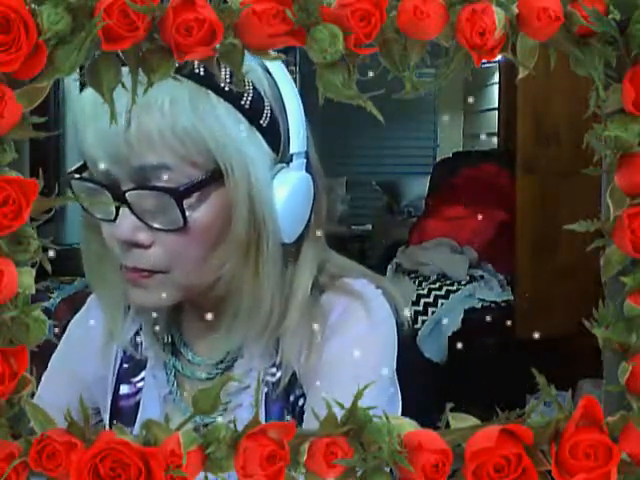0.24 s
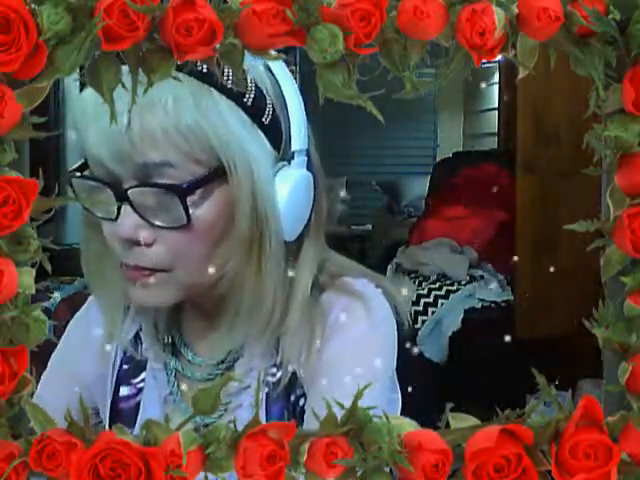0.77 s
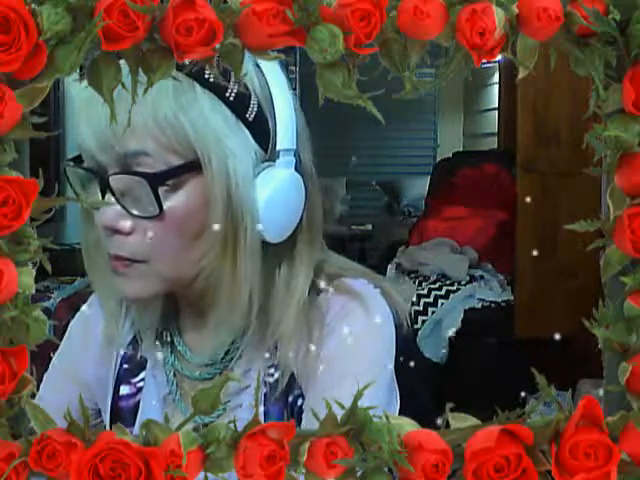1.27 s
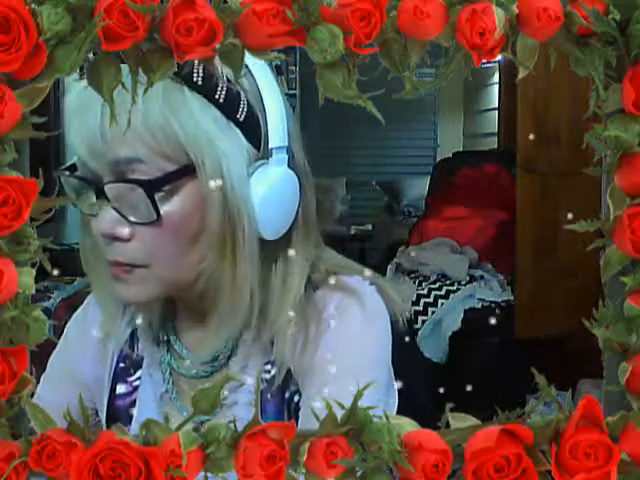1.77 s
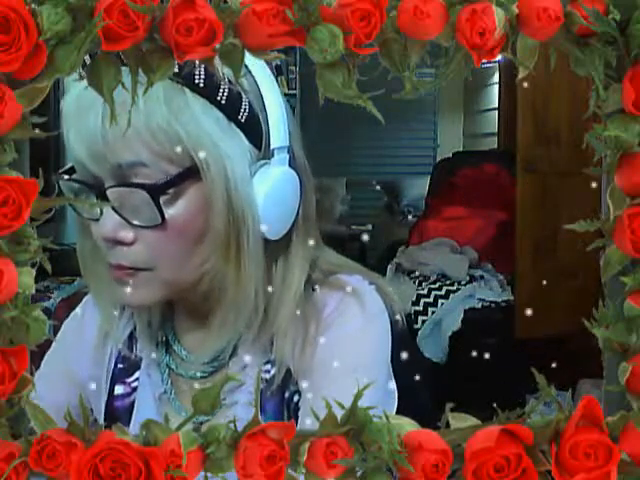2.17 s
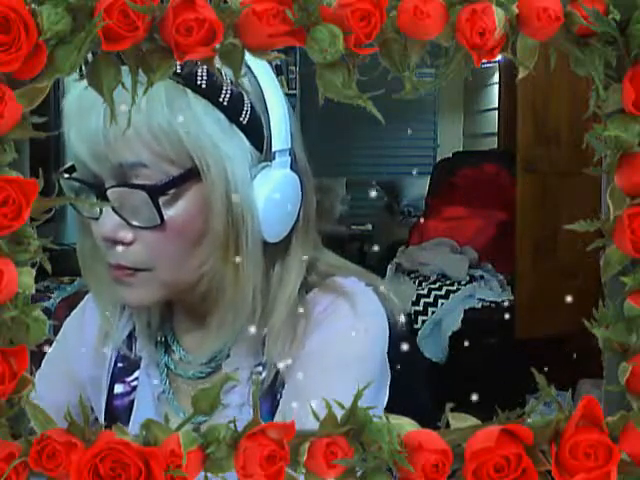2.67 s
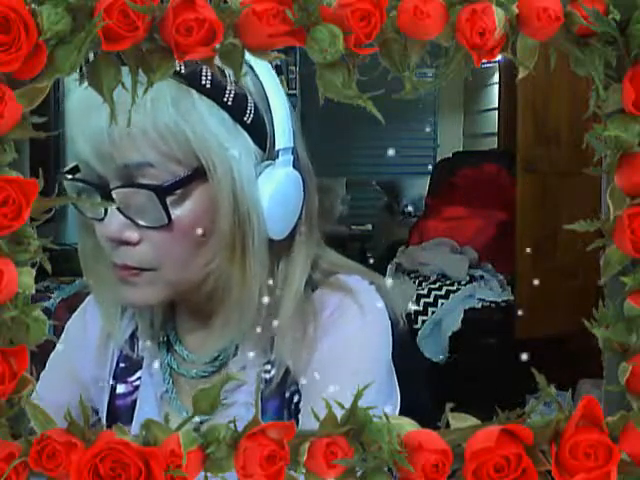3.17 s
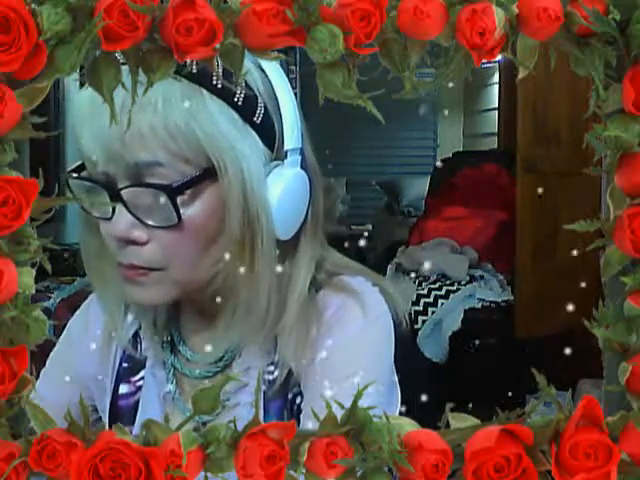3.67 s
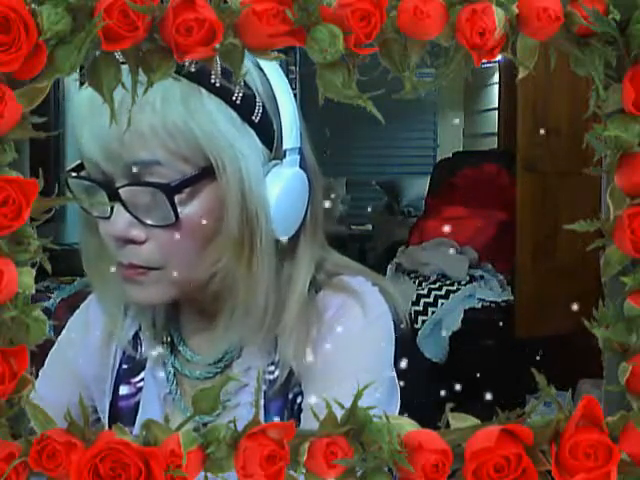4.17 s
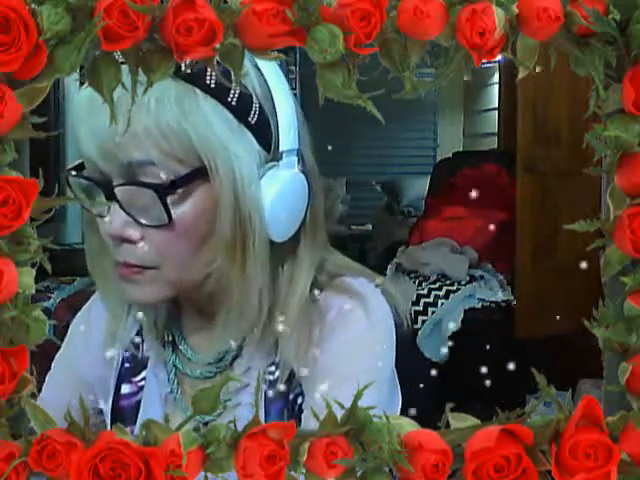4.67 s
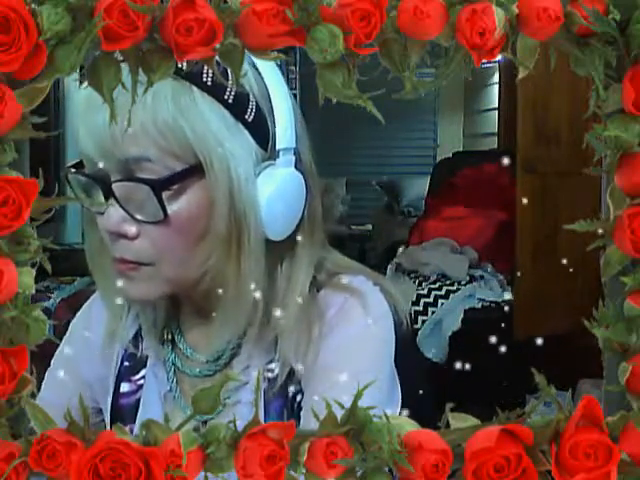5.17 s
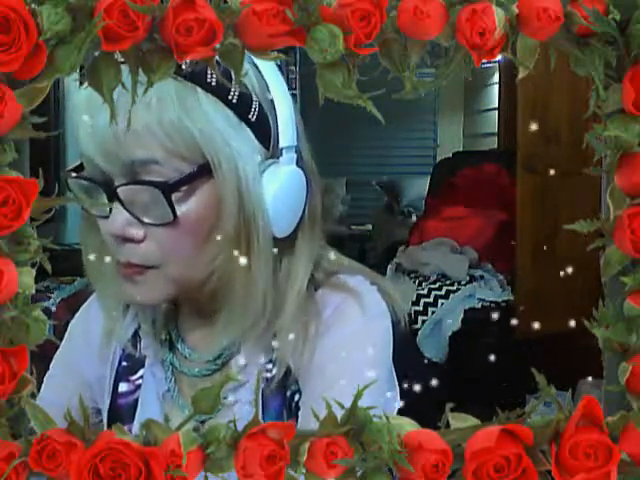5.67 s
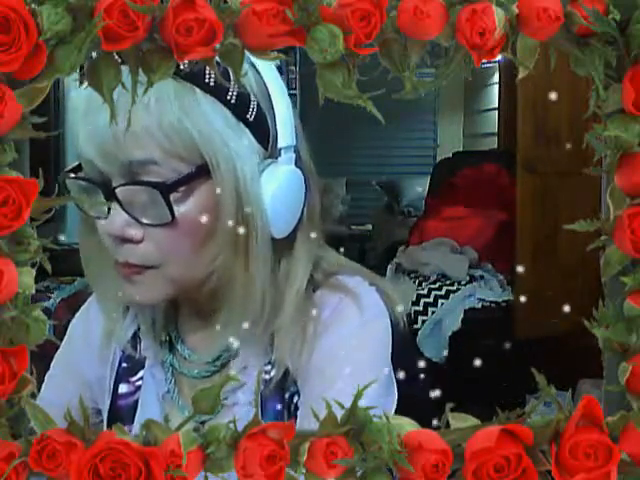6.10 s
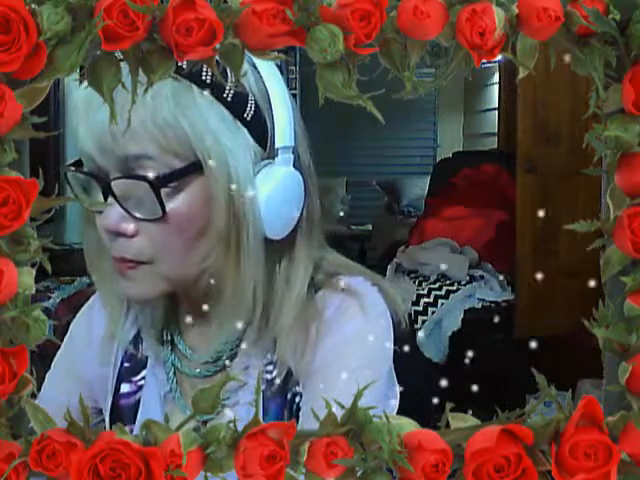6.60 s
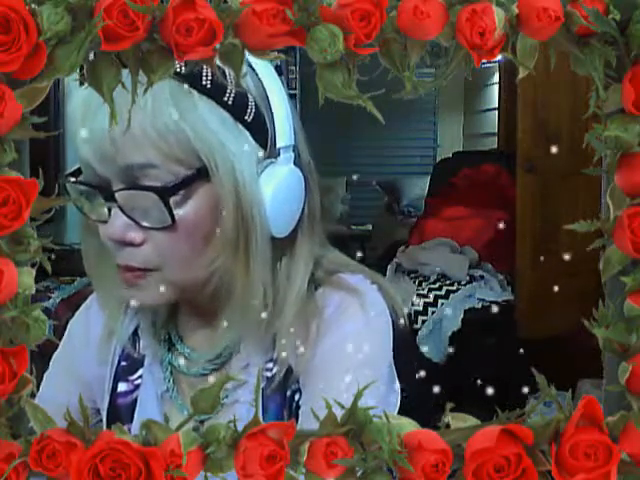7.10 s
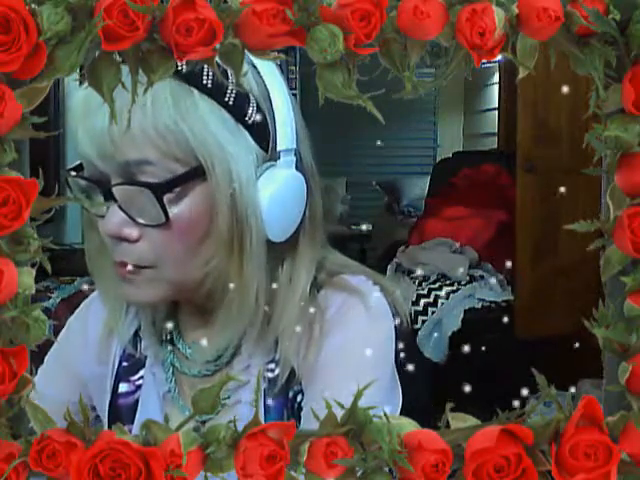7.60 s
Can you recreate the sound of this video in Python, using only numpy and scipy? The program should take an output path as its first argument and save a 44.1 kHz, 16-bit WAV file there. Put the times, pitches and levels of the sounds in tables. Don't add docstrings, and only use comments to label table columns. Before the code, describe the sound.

A desk microphone in a small quiet room hears slow plastic keyboard typing over faint mains hum, hiss and a low cooling-fan drone. From 0 to 0.7 seconds there are light, dry taps with soft low desk thumps. A loud clack lands at 0.9, followed by clicking returns and another loud stroke at 1.6. A lighter tap comes at 2.2, a soft one at 2.9, then a bright firm press at 3.2 with its spring-back. More taps and heavy desk thuds follow at 3.9 and 4.2, a weak press at 4.9, and the hardest, sharpest clack at 5.2. Afterwards only faint brushes remain until a moderate press at 6.6. From about 7 the fan speeds up, its pitch edging higher with a brief airy surge near 7.2, while faint last taps and clicks come around 7.75. Each firm key rattles the board briefly with a short room reflection.

```python
import sys
import numpy as np
from scipy import signal
from scipy.fft import rfft, irfft, next_fast_len
from scipy.io import wavfile
from scipy.ndimage import uniform_filter1d, map_coordinates

SR = 44100
rng = np.random.default_rng(int(sys.argv[2]) if len(sys.argv) > 2 else 0)


def makeup_ratio(level_db):
    decades = np.asarray(level_db, float) / 20
    return 10 ** decades


def unload_wav(signal):
    wavfile.write(
        sys.argv[1],
        SR,
        np.round(np.clip(np.atleast_2d(signal).T, -1, 1) * 32767).astype(np.int16),
    )


N = 346168


def unit(x):
    return x / np.sqrt(np.mean(x ** 2) + 1e-20)


def along(points, hz):
    f, v = np.transpose(points)
    return np.interp(np.log(hz + 1), np.log(f + 1), v)


def wobble(rate_hz, size=N):
    knots = rng.standard_normal(int(size * rate_hz / SR) + 4)
    return map_coordinates(knots, [np.arange(size) * rate_hz / SR])


def filtered(x, points):
    m = next_fast_len(len(x) + 8192)
    gain = makeup_ratio(along(points, np.fft.rfftfreq(m, 1 / SR)))
    return irfft(rfft(x, m) * gain, m)[:len(x)]


def patchy(patchy_db):
    z = signal.stft(rng.standard_normal(N + 512), nperseg=512)[2]
    field = uniform_filter1d(rng.standard_normal(z.shape), 8, 0)
    field = uniform_filter1d(field, 16, 1)
    return signal.istft(z * makeup_ratio(patchy_db * unit(field)), nperseg=512)[1][:N]


def add(track, start_s, sound):
    part = track[max(round(start_s * SR), 0):][:len(sound)]
    part += sound[:len(part)]


def ring(modes, t, spread_db, detune, rise_s):
    luck = rng.standard_normal((len(modes), 2))
    x = np.zeros(len(t))
    for k, ((hz, db, t60), (harder, sharper)) in enumerate(zip(modes, luck)):
        decay = makeup_ratio(db + spread_db * harder - 60 * t / t60)
        x += (-1) ** k * decay * np.sin(2 * np.pi * hz * (1 + detune * sharper) * t)
    x = x * (1 - np.exp(-t / rise_s))
    return x / np.abs(x).max()


# [pitch_hz, level_db per Hz]
HISS = [(15, -41), (25, 3), (123, -1), (167, -6), (617, -11.5), (684, -13.5), (818, -13), (1330, -12.5),
        (1720, -25), (2730, -21.5), (4930, -23.5), (5600, -23.5), (6050, -29.5), (10400, -29.5),
        (11500, -34), (14900, -77), (22000, -120)]
# [pitch_hz, level_db rms, unsteadiness in radians]
TONES = [(119.8, -55, .2), (206, -67, .9), (2070, -69, .6), (3338, -79, 1.2), (4360, -80, .8),
         (4479, -80, .8), (5766, -72, .9), (6481, -81, .8)]


def floor():
    t = np.arange(N) / SR
    tones = np.zeros(N)
    for hz, db, shaky in TONES:
        level = makeup_ratio(db + 1.2 * wobble(9.8))
        tones += level * np.sin(2 * np.pi * hz * t + shaky * wobble(25))
    hiss = makeup_ratio(-53) * unit(filtered(patchy(patchy_db=1.17), HISS))
    return hiss + np.sqrt(2) * tones


# [start_s, blade_pass_hz, load_db]
FAN = [(0, 103.1, 0.1), (3, 103.2, -1.7), (6.65, 103.4, 0.3), (6.851, 103.6, 0.5), (7.022, 105.7, 1.5),
       (7.221, 107.7, 9.5), (7.351, 109.3, 0.5), (7.44, 108.8, -1), (7.55, 110.2, 4), (7.649, 110.8, 1.2),
       (7.85, 111.2, -1.5)]
# [multiple of blade pass, idle_db, full_speed_db]
BLADES = [(3.104, -11.5, -8.5), (5.24, -15.5, -14), (6.03, -12, -10.5), (7.855, -9, -11.5),
          (8.91, -10.5, -10), (13.07, -33.5, -2.5), (13.86, -6, -1), (14.85, -6.5, -2.5), (15.96, -4, -2),
          (17.17, -3.5, -14), (18.6, -17, -14.5), (20, -21, -22), (21.3, -25, -11), (22.47, -13, -22)]
# [pitch_hz, width_hz, gain_db]
CASE = [(328, 16, 8), (886, 12, 13), (1612, 18, 6)]
# [pitch_hz, level_db per Hz]
AIR = [(900, -50), (1250, -53), (1450, -3.5), (1750, 1), (2050, 2.5), (2250, -9.5), (2600, -8), (4000, -73)]
# [pitch_hz, level_db per Hz]
GRILLE = [(2600, -38), (3150, -3.5), (3350, -0.5), (3600, 2.5), (3900, -10), (4600, -39)]

DRONE_DB, AIR_DB, AIR_LAG_S, AIR_PER_LOAD = -59, -58, 0.065, 0.68
GRILLE_DB, GRILLE_SPINUP_DB = -68.5, 3.5


def fan():
    t = np.arange(N) / SR
    s, speed_hz, load_db = np.transpose(FAN)
    hz = np.interp(t, s, speed_hz)
    effort = np.clip((hz - speed_hz[0]) / (speed_hz[-1] - speed_hz[0]), 0, 1)
    surge_db = np.interp(t, s, load_db)
    turn = 2 * np.pi * np.cumsum(hz) / SR
    drone = np.zeros(N)
    for multiple, idle_db, full_db in BLADES:
        k = round(multiple)
        lift_db = sum(gain / (1 + ((k * hz - centre) / width) ** 2) for centre, width, gain in CASE)
        db = idle_db + effort * (full_db - idle_db) + lift_db + surge_db * (multiple > 12)
        phase = k * turn + 0.22 * wobble(16) + 2 * np.pi * rng.random()
        drone += makeup_ratio(db + 1.88 * wobble(8)) * np.sin(phase)
    grille_db = GRILLE_DB + GRILLE_SPINUP_DB * effort + 3.4 * wobble(3.05)
    grille = makeup_ratio(grille_db) * unit(filtered(patchy(patchy_db=1.0), GRILLE))
    air_db = AIR_DB + AIR_PER_LOAD * np.interp(t - AIR_LAG_S, s, load_db) + 1.0 * wobble(6.4)
    air = makeup_ratio(air_db) * unit(filtered(patchy(patchy_db=2.5), AIR))
    return np.sqrt(2) * makeup_ratio(DRONE_DB) * drone + air + grille


# [start_s, peak_db, panel_db, rebound_loss_db]
LEANS = [
    (0.34, -33.5, -6, 6),
    (0.729, -31, 2.5, 8),
    (2.192, -36.5, 1.5, 5),
    (2.408, -38.5, -4.5, 6),
    (2.941, -38, 4.5, 8.5),
    (3.871, -31.5, -3.5, 11),
    (4.212, -28.5, 1.5, 10),
]


def leans():
    rebound_s, softer_db = 0.058, 4
    return [(s + k * rebound_s, db - k * loss, -10, panel, -14 - k * softer_db, 0.19)
            for s, db, panel, loss in LEANS for k in range(2)]


# [start_s, peak_db, panel_db, knock_db]
JOLTS = [(0.057, -49, -15, 1.5), (0.101, -40.5, -5, -10), (0.2, -46.5, -0.5, -5.5),
         (0.508, -48, -13, -22.5), (0.945, -37, -1, -2), (1.042, -46.5, 3.5, -14),
         (1.455, -37.5, -8.5, -21), (1.594, -37.5, 3, -23), (1.672, -40, 5.5, -6.5),
         (1.751, -51.5, 5.5, -8), (2.758, -42, -3, -16), (3.174, -41.5, 6.5, -17), (3.254, -38.5, 6.5, -11),
         (3.458, -37, -9, -19.5), (4.93, -41, 1, -12), (5.258, -32.5, -5, -21), (5.331, -36.5, 7, -5),
         (6.29, -52, -12, -17), (6.608, -40, 1.5, -22), (6.67, -57, 13.5, -9), (7.767, -47.5, -0.5, -19)]


def jolts():
    return [(s, db, -7, panel, knock, 0.19) for s, db, panel, knock in JOLTS]


# [pitch_hz, level_db]
TOP = [(82, -6.5), (102, 1)]
# [pitch_hz, level_db]
SWAY = [(36, -2), (48, 0)]
# [pitch_hz, level_db]
PANEL = [(153, -1), (176, 0), (205, -6)]
# [pitch_hz, level_db]
KNOCK = [(300, 1.5), (360, -2.5), (430, 10), (520, 5), (630, 5.5)]
# [pitch_hz, level_db per Hz]
CLUTTER = [(30, -30), (60, -3), (150, -6.5), (250, -6.5), (350, -8.5), (480, -18.5), (800, -60)]

CLUTTER_DB, CLUTTER_T60_S, CLUTTER_RISE_S = -5.5, 0.34, 0.03


def desk():
    out, t = np.zeros(N), np.arange(SR // 2) / SR
    lead_s = 0.013
    for s, db, sway_db, panel_db, knock_db, t60 in leans() + jolts():
        # modes, level_db, share of the decay time, rise_s
        parts = ((TOP, 0, 1.2, 0.05), (SWAY, sway_db, 1.5, 0.02),
                 (PANEL, panel_db, 0.8, 0.01), (KNOCK, knock_db + 5.5, 0.3, 0.003))
        for modes, part_db, life, rise_s in parts:
            lasting = [(hz, level, life * t60) for hz, level in modes]
            swing = ring(lasting, t, spread_db=2.2, detune=0.035, rise_s=rise_s)
            add(out, s - lead_s, makeup_ratio(db + part_db + 3.0) * swing)
        shaken = unit(filtered(rng.standard_normal(len(t)), CLUTTER))
        shaken = shaken * makeup_ratio(-60 * t / CLUTTER_T60_S) * (1 - np.exp(-t / CLUTTER_RISE_S))
        add(out, s - lead_s, makeup_ratio(db + CLUTTER_DB) * shaken)
    return out * makeup_ratio(2.2 * wobble(40))


# [pitch_hz, t60_s]
ROOM = [(200, 0.24), (1500, 0.09), (4000, 0.25), (10000, 0.15)]


def room_tail(t, first_s):
    hz, frames, z = signal.stft(rng.standard_normal(len(t)), SR, nperseg=256)
    decay = makeup_ratio(-60 * frames / along(ROOM, hz)[:, None])
    x = signal.istft(z * decay, SR, nperseg=256)[1][:len(t)]
    x = x * np.clip(t / first_s, 0, 1) ** 2
    return x / np.linalg.norm(x)


# [start_s, peak_db, guide_db, snap_db]
BRUSHES = [
    (1.125, -58.5, -6, -4),
    (1.299, -59, -4, -2),
    (2.4023, -48, -2, -26),
    (3.5541, -57.5, -10, 4),
    (3.5917, -53, -5.5, -3),
    (5.811, -45.5, -10, -25),
    (6.101, -60.5, 9, 9),
    (6.2499, -55, 3, -2),
    (6.362, -54, 9, -0.5),
    (7.738, -51, 11, -7),
]


def brushes():
    return [(s, db, -16, -6, guide, snap) for s, db, guide, snap in BRUSHES]


# [start_s, peak_db, guide_db, snap_db]
RELEASES = [
    (0.5091, -41.5, 3, -1.5),
    (1.038, -40, -2, -0.5),
    (1.42, -33.5, 0, -1.5),
    (1.6756, -37.5, 6, 1.5),
    (3.247, -34, 5.5, 3.5),
    (3.9903, -52.5, 10, 7.5),
    (4.2698, -55, -6, -0.5),
    (5.3195, -30.5, 3, -0.7),
    (6.6669, -41, 6, 6.5),
    (7.8254, -57, 10, -6),
]


def releases():
    return [(s, db, -14.5, -16, guide, snap) for s, db, guide, snap in RELEASES]


# [start_s, peak_db, cap_db, guide_db, snap_db]
TAPS = [
    (0.0547, -39, -27, -7, -10),
    (0.174, -36, 1.2, 1.5, -7),
    (0.3258, -42, -6, 6, -6),
    (0.7097, -34, -6.5, -6, -4.5),
    (1.4243, -37, 12, -12, -16),
    (2.1849, -31.5, 4.5, -5, -14.5),
    (2.9245, -40, 5, -5, -9.5),
    (3.4307, -46.5, 4.5, 4, -2.5),
    (3.8542, -33, -18, 3, -9),
    (7.7472, -45, -4, -4, -20),
]


def taps():
    return [(s, db, -11, cap, guide, snap) for s, db, cap, guide, snap in TAPS]


# [start_s, peak_db, tray_db, cap_db, guide_db]
PRESSES = [
    (0.077, -52.5, 6, -3, -11),
    (0.9325, -19, -10.5, -14, 5),
    (1.5889, -17.5, -10, -20, 3),
    (3.1571, -21, -8.5, -5, 5.5),
    (4.1994, -27, -8.5, -13, -1.5),
    (4.9267, -38.5, -4, -2, 1.5),
    (5.238, -12, -12, -6, 4),
    (6.5952, -27.5, -3.5, -12, 5),
]


def presses():
    return [(s, db, tray, cap, guide, -8 + guide) for s, db, tray, cap, guide in PRESSES]


def slaps():
    lead_s, softer_db = 0.0046, -32.5
    return [(s - lead_s, db + softer_db, -25, -25, -3, 12) for s, db, *_ in PRESSES]


# [pitch_hz, level_db, t60_s]
STEM = [(3290, -2.5, 0.0059), (3770, -0.5, 0.0077), (3830, 0, 0.0037)]
# [pitch_hz, level_db, t60_s]
TRAY = [(800, -11, .02), (960, -11, .018), (1170, -3, .022), (1255, 0, .028), (1430, -8, .018)]
# [pitch_hz, level_db, t60_s]
CAP = [(2070, -22, 0.055), (2245, 20, 0.0072), (2630, 20, 0.0062), (3126, 17, 0.01)]
# [pitch_hz, level_db, t60_s]
SNAP = [(6310, 1, 0.007), (7730, 11.5, 0.0037), (8120, 2, 0.0089), (8860, 20, 0.0022),
        (10130, 12.5, 0.0032), (10640, -4, 0.0079)]
# [pitch_hz, level_db, t60_s]
GUIDE = [(4174, 8.5, 0.0038), (4760, -2, 0.0071), (5050, 6.5, 0.003), (5496, -6, 0.0064)]
# [pitch_hz, level_db per Hz]
RATTLE = [(240, -12), (400, -5.5), (879, -5.5), (1610, -3.5), (2380, -13), (2820, -2.5), (4480, -11.5),
          (7430, -8), (10300, -55), (11500, -44), (14900, -66), (22000, -120)]


def keys():
    out, t, short = np.zeros(N), np.arange(SR // 2) / SR, np.arange(SR // 20) / SR
    lead_s = 0.007
    for s, db, tray_db, cap_db, guide_db, snap_db in presses() + slaps() + taps() + releases() + brushes():
        scraping_db = max(guide_db, 0)
        chatter_s = np.clip(0.0022 - 0.00008 * (db + scraping_db), 0.002, 0.01)
        click, body = np.zeros(len(short)), np.zeros(len(short))
        # modes, level_db, scrape_db, delay_s, extra_blow_db
        parts = ((SNAP, snap_db + 5, -13, -0.0005, 0), (GUIDE, guide_db, -22, 0, 0),
                 (STEM, 0, -24, 0.0006, 0), (CAP, cap_db, -26, 0.0009, 0),
                 (TRAY, tray_db + 5.5, -34, 0.0015, 20))
        for modes, part_db, early_db, late_s, heavy_db in parts:
            after = short - lead_s - late_s
            away = np.abs(after)
            landing = (after > 0) * makeup_ratio(-6 * away / chatter_s) / (1 + (away / chatter_s) ** 6)
            scrape = (after < 0) * makeup_ratio(early_db - 60 * away / 0.02) * np.clip(short / 0.00077, 0, 1)
            blow = makeup_ratio(28 + 0.45 * db + heavy_db) * (np.round(after * SR) == 0)
            force = (landing + scrape) * rng.standard_normal(len(short)) + blow
            bell = ring(modes, short, spread_db=2.5, detune=0.02, rise_s=0.0005)
            part = signal.fftconvolve(force, bell)[:len(short)]
            click += makeup_ratio(part_db) * part / np.abs(part).max()
            body += makeup_ratio(part_db) * bell
        wet = signal.fftconvolve(body, room_tail(t, first_s=0.0098))[:len(t)]
        wet = makeup_ratio(-6.5 - 0.19 * db + 1.1 * wobble(163, size=len(t))) * wet
        shake = unit(filtered(rng.standard_normal(len(t)), RATTLE))
        shake = shake * makeup_ratio(-60 * t / 0.21) * np.clip(t / 0.013, 0, 1) ** 3
        shake = makeup_ratio(scraping_db - 12.0 + 2.0 * wobble(221.6, size=len(t))) * shake
        add(out, s - lead_s, makeup_ratio(db + 2.5) * click)
        add(out, s - lead_s, makeup_ratio(db - 2.5) * (wet + shake))
    return out


def scene():
    return (floor() + fan() + desk() + keys())[None]


def low_pass(x):
    return signal.sosfilt(signal.butter(12, 11640, fs=SR, output="sos"), x)


# [pitch_hz, level_db]
BAND = [(60, -0.5), (10300, 3), (11000, -0.5), (11700, -5.5), (12500, -47), (15500, -48), (16000, -90)]


def record(dry):
    mix = np.clip(filtered(dry[0], BAND), -0.9, 0.9)
    return low_pass(mix[None])


dry = scene()
out = record(dry)
unload_wav(out)
```